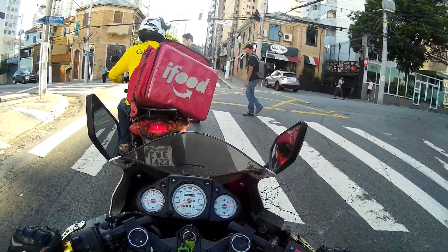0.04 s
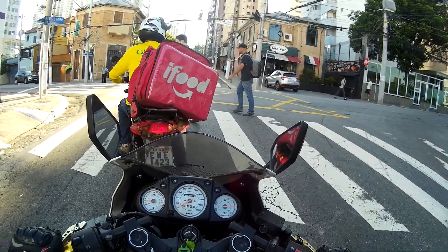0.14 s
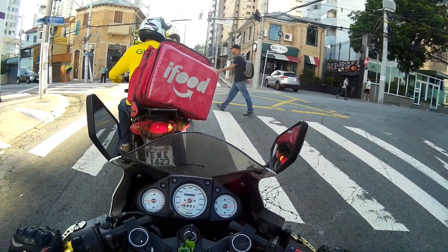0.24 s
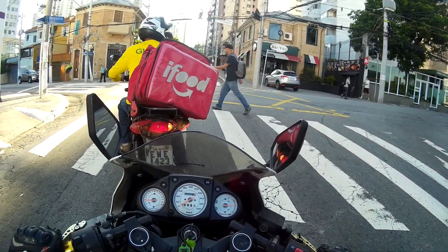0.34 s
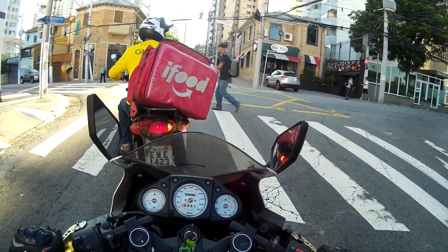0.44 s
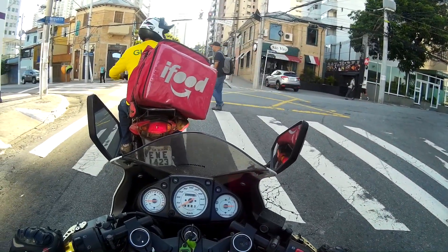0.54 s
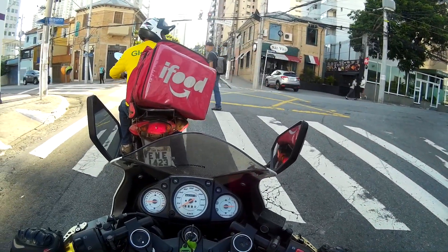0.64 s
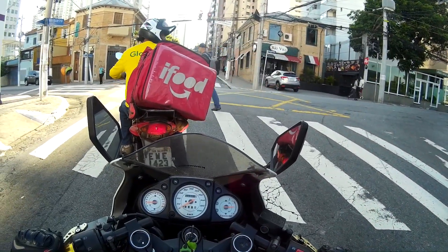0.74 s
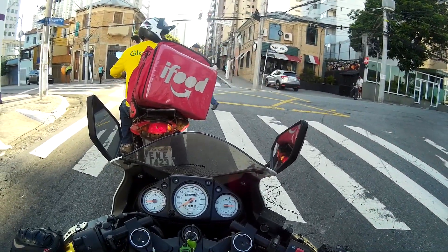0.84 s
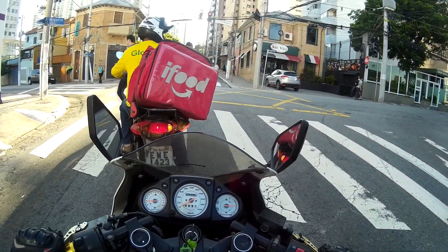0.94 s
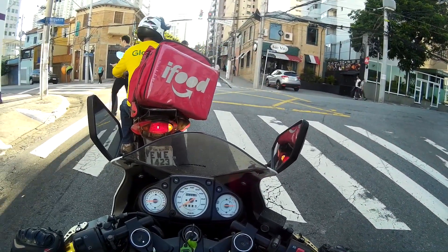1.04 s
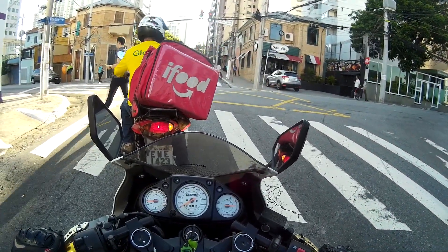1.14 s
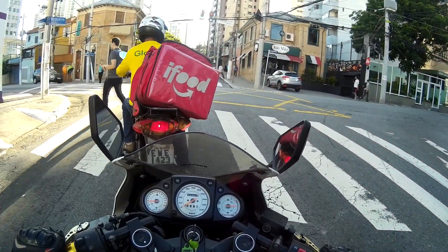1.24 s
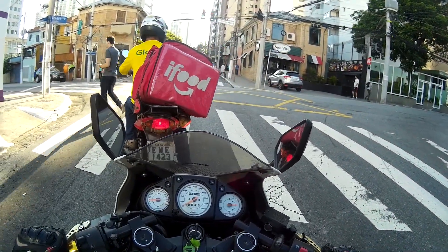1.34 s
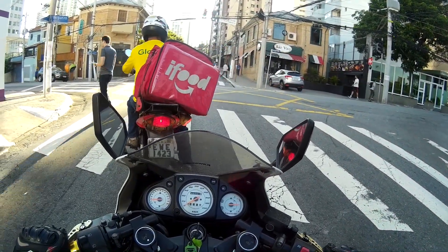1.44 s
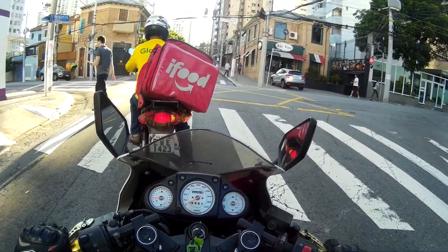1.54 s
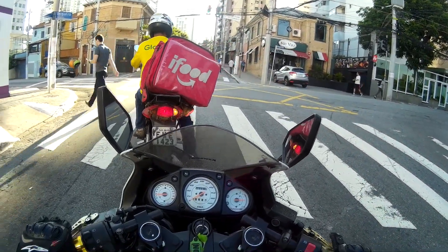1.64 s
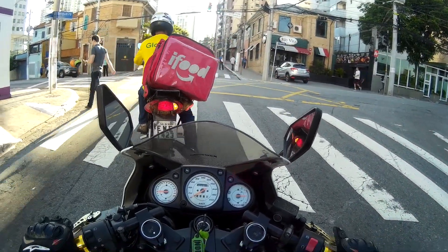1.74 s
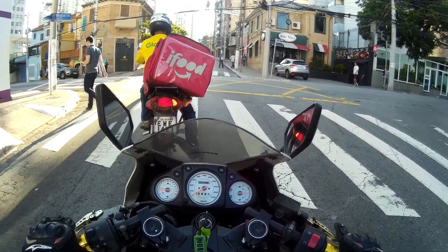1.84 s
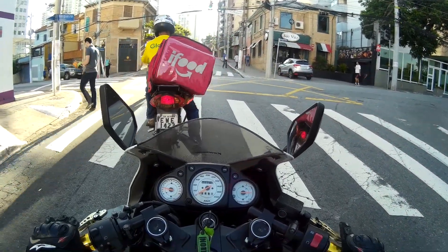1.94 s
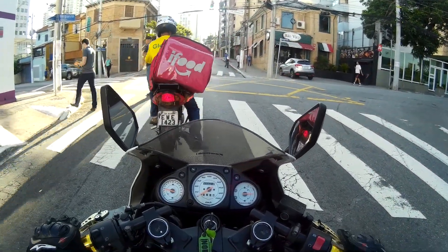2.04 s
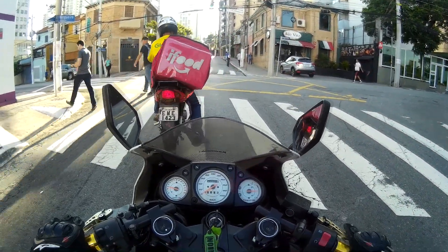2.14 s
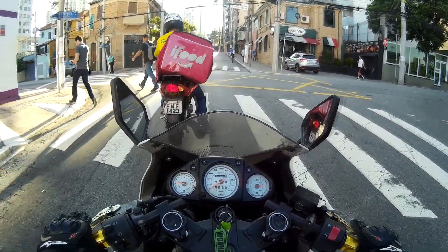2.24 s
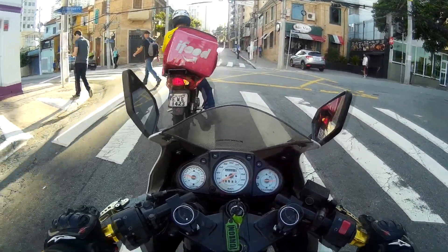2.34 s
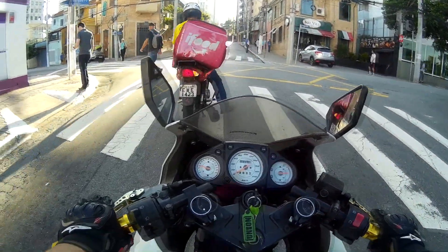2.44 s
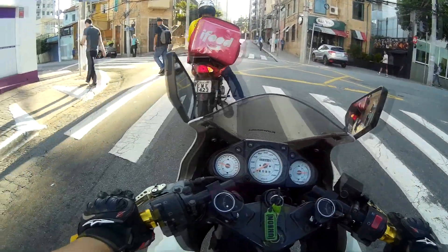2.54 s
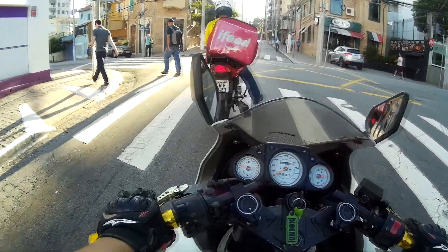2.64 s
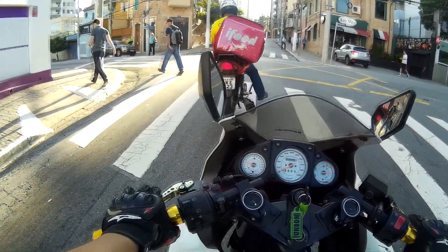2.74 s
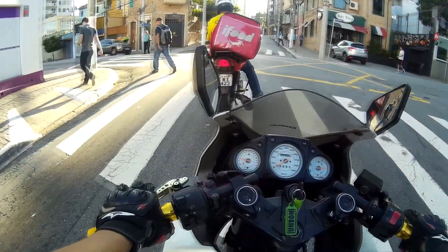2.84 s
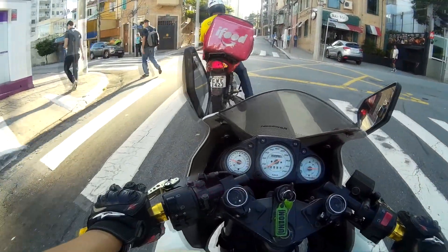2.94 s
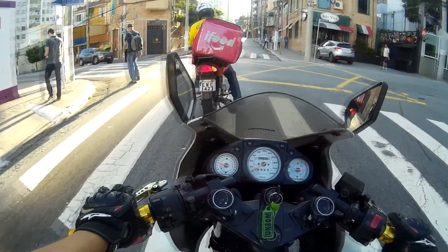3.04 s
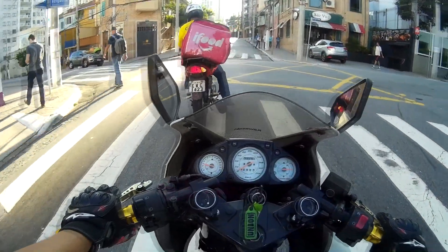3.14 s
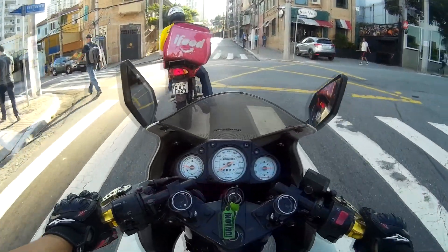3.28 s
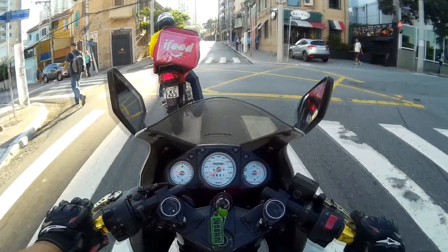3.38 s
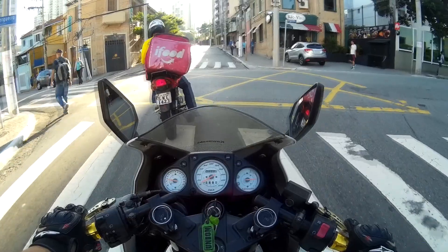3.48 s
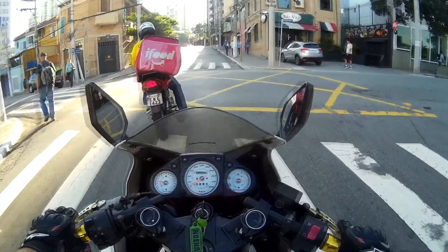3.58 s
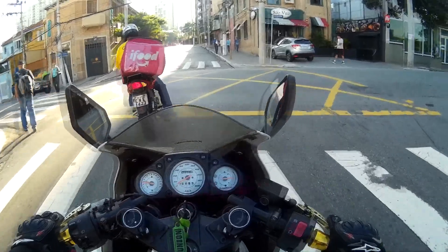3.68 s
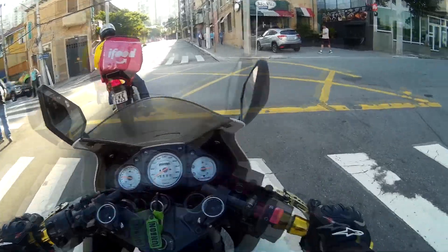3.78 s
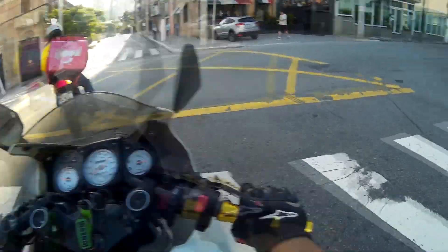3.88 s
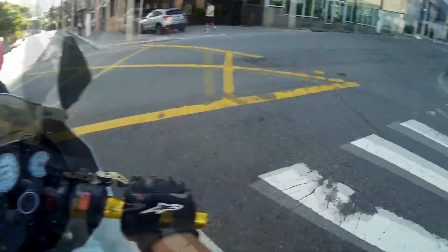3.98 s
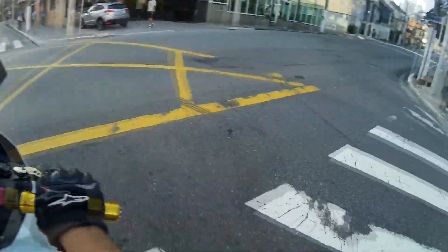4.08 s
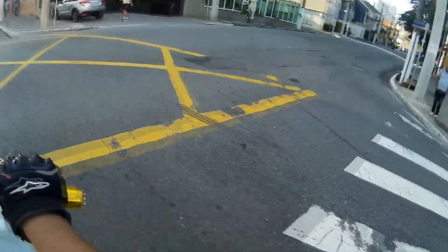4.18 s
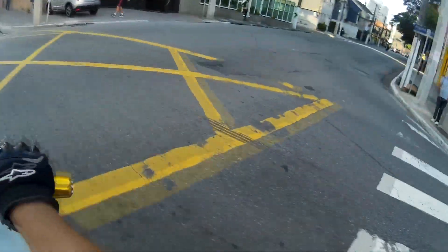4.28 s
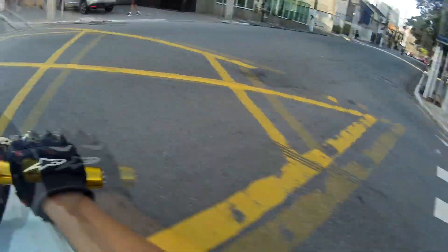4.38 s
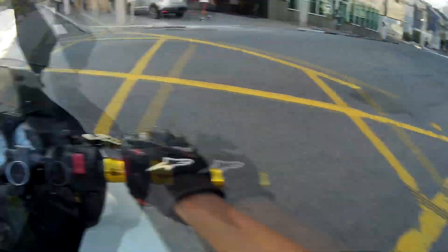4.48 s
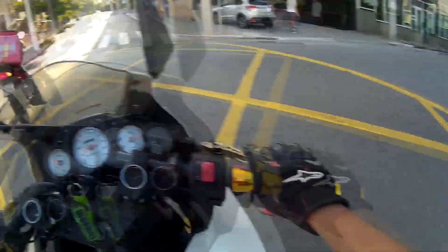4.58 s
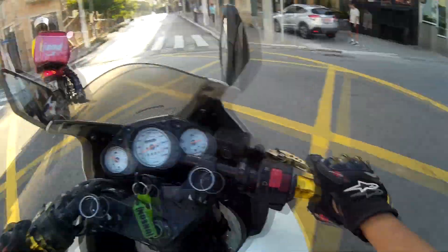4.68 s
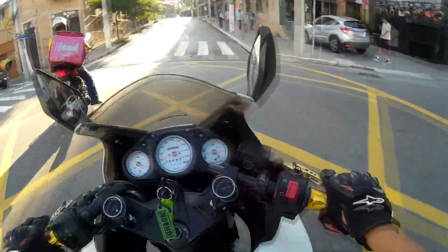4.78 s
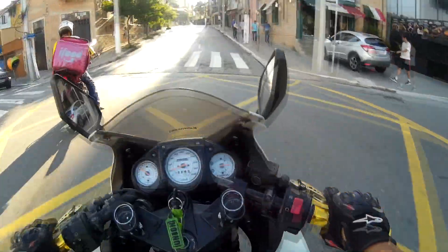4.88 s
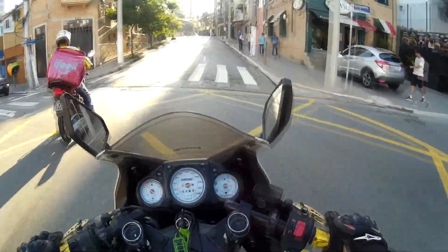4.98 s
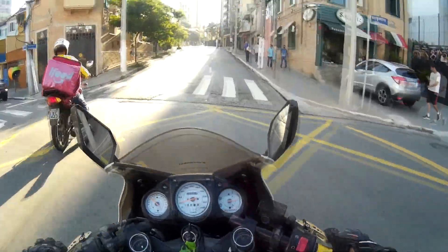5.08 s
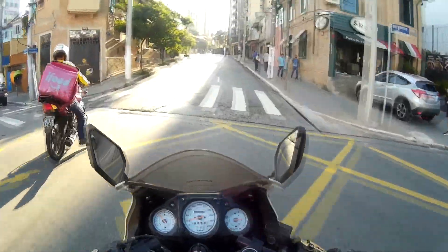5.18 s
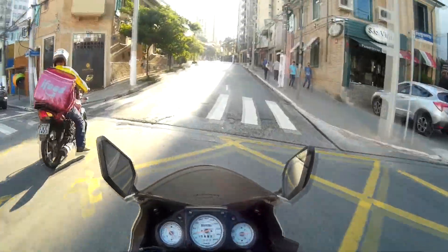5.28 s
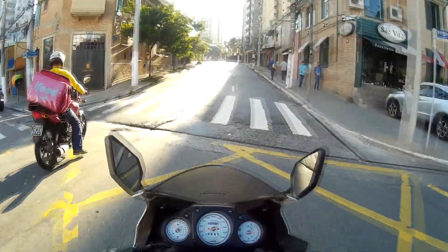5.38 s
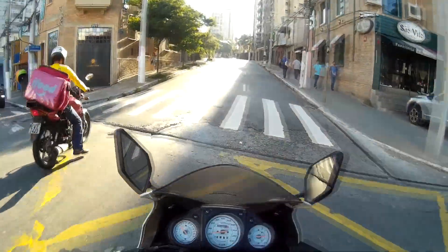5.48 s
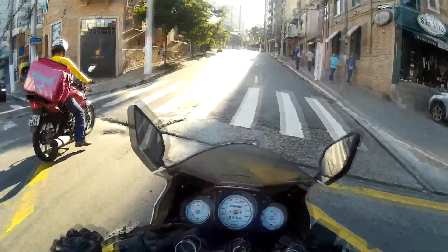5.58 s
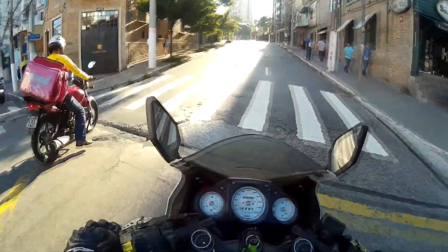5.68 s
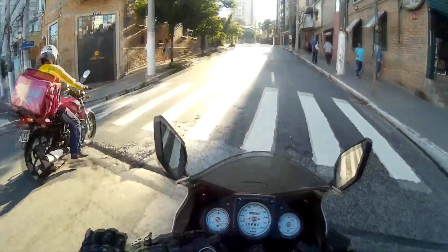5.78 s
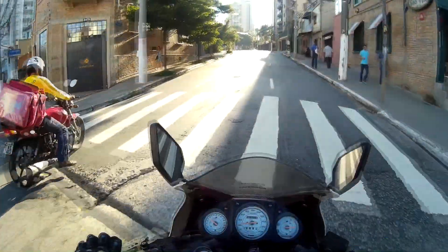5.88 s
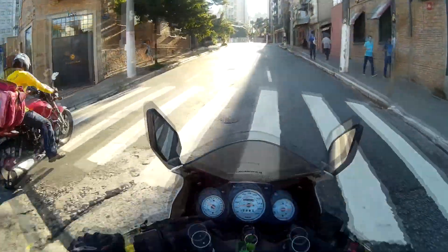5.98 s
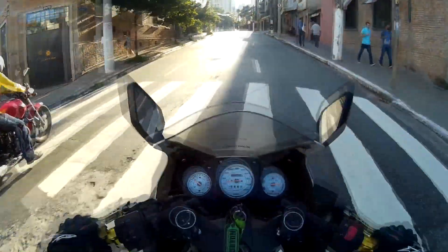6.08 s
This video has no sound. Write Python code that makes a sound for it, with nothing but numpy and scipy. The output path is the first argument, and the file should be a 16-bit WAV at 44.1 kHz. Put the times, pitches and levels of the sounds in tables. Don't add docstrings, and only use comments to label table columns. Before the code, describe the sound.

A twin-cylinder motorcycle idles quietly at a city crossing, blips and pulls away, climbs to a loud raspy roar, then dips for a gear change.

```python
import sys
import numpy as np
from scipy import signal
from scipy.fft import rfft, irfft
from scipy.io import wavfile

SR = 44100
rng = np.random.default_rng(int(sys.argv[2]) if len(sys.argv) > 2 else 0)


def master_out(mix):
    frames = np.transpose(np.atleast_2d(mix))
    ceiling = np.clip(frames, -1, 1)
    pcm = np.round(ceiling * 32767).astype(np.int16)
    wavfile.write(sys.argv[1], SR, pcm)


def linear_from_db(decibels):
    return 10 ** (np.asarray(decibels, float) / 20)


N = 269892

# time_s, speed_cycles_per_s
CRANK_SPEED = [(0.0, 13.64), (0.45, 13.14), (1.42, 13.75), (1.61, 13.22), (1.76, 21.48), (1.96, 25.51),
               (2.1, 24.26), (2.22, 24.25), (2.78, 20.52), (3.37, 20.9), (3.9, 27.27), (5.04, 42.62),
               (5.09, 40.3), (5.2, 39.84), (5.31, 37.15), (5.54, 36.41), (5.66, 30.81), (6.12, 35.22)]
CYCLES_AT_START = -.858
MID_SPEED = 27
# time_s, combustion_effort_db, gas_heat_0_to_1
THROTTLE = [(0, -45.5, 0.57), (1.56, -49, 0.26), (1.66, -37, 0.9), (1.78, -27.5, 0.02), (2.0, -23, 0.39),
            (2.4, -27.5, .23), (2.9, -33, 0.42), (3.55, -26.5, 0.49), (3.9, -21, 0.66), (4.25, -18, 0.84),
            (4.55, -16.5, 0.89), (5.07, -19.5, 0.83), (5.15, -34.5, 0.7), (5.35, -44, 0.2),
            (5.44, -29.5, 0.9), (5.62, -23.5, 0.82), (5.95, -23, 0.97), (6.12, -21, 0.9)]
MID_EFFORT_DB = -30
# centre_s, width_s, change_db
UNEVEN_COMBUSTION = [(1.794, 0.0097, -11), (1.88, .02, 3), (1.92, .02, 3), (1.967, 0.035, -8.5),
                     (2.123, 0.025, -11), (4.334, 0.013, 0.5), (5.119, 0.014, -4.5), (5.144, 0.012, 9),
                     (5.242, 0.039, 9.5), (5.38, 0.0087, -22), (5.628, 0.022, -1.5)]
# level_at_mid_effort_db, effort_slope_db_per_db,
# gain_facing_pipe_db, speed_slope_db_per_cycle_per_s
VOICE_PARTS = dict(blast=(-49, 1.2, 11.5, -0.184), thump=(-27.5, .05, 0.1, 0.06),
               snap=(-43.5, 1.5777, 2.5, 0.23), edge=(-52.5, 0.9, 9.5, 0.886),
               rasp=(-62, 0.6465, -6.5, -0.21), whine=(-60.5, 0.37, -7.5, 0.79))

DEEP_MODES = [(108, 0, .057, -1)]
CHAMBER_MODES = [(153, 0, 0.041, -1)]
THUMP_MODES = [(234, 0, .035, 1)]
RING_MODES = [(493, 0, .052, 1)]
SNAP_MODES = [(616, 0, .024, 1), (809, -4, .032, -1)]
EDGE_MODES = [(993, -3, 0.019, 1), (1116, 1.5, 0.0091, -1), (1960, -18.5, 0.0014, 1)]
# pitch_hz, level_db, t60_s, sign
BLAST_MODES = [(646, 0, 0.01, 1)]
LEADS_S = dict(deep=.0003, thump=.0024, bark=.0011)
SOFT_HZ = dict(low=480, bark=2230)
COOL, HOT = .94, 1.035

IDLE_BELOW_DB, IDLE_THUMP_LOSS = -38, 1.04
DEEP_FADES_AT, DEEP_LOSS_DB = 0.54, 78
CHAMBER_DB, CHAMBER_FROM, CHAMBER_RISE_DB, CHAMBER_TOP_DB = -10.5, 23.7, 9.4, -7.5
OVERRUN_LOSS, OVERRUN_BOOM, CHAMBER_BOOM = .9, .25, 0.42
SECOND_DB, SECOND_FACING_DB = 0.16, 2.5
TURN_S, TURN_WIDTH_S = 4.175, 0.19
RING_FACING_DB, RING_DB_PER_SPEED = -3.5, 0.188

# frequency_hz, density_db_per_hz
JET_SPECTRUM = [(700, -21), (1100, -3), (1500, 1.5), (1900, 1), (2400, -7.5), (2900, -9.5), (3500, -14),
                (4050, -23), (4700, -15.5), (5700, -31.5), (7000, -24.5), (10000, -44.5), (16000, -40.5)]

GEAR_ORDER = 46
CASE_HZ, CASE_WIDTH_HZ, CASE_DB = 1804, 51, 8.5
CLUTCH_OUT_S, CLUTCH_IN_S = 5.06, 5.44
COAST_LOSS, UNLOADED_DB = 9, -5

# start_s, peak_db, pitch_hz, t60_s
METAL_TICKS = [
    (1.791, -53, 7360, 0.02),
    (1.83, -56, 7400, 0.027),
    (1.857, -53, 7300, 0.024),
    (1.92, -44.5, 7300, 0.016),
    (5.556, -54.5, 3460, 0.14),
    (5.58, -49, 3900, 0.065),
]

# time_s, level_db
NEIGHBOUR_LEVEL = [(0, -70), (1.3, -72), (1.42, -87), (1.66, -74), (1.85, -65), (2.5, -68), (3.0, -73.5),
                   (4.5, -77), (5.25, -67.5), (5.36, -85), (6.12, -69)]
RATTLES_PER_S, RATTLE_CYCLES, NEIGHBOUR_HISS_DB = 120, 45.0, 6

# frequency_hz, density_db_per_hz
TRAFFIC_SPECTRUM = [(30, -16), (100, -3), (220, 2), (350, -4.5), (490, -6.5), (900, -12.5), (1200, -22),
                    (1700, -20), (2900, -38.5), (3700, -36.5), (5600, -45.5), (10000, -44), (15500, -52.5),
                    (20000, -73)]
STREET_DB, STREET_RISE_DB_PER_S = -44, 1
PASSING_DB, PASSING_S, PASSING_WIDTH_S = 1.5, 0.08, 0.3
WIND_DB, GUST_DB, GUST_S, GUST_WIDTH_S = -51, 9, 4.6, 0.45
IMAGE_HZ = 16000


def unit(x):
    return x / np.sqrt(np.mean(x ** 2) + 1e-20)


def in_time(rows):
    s, *columns = np.transpose(rows)
    return [np.interp(np.arange(N) / SR, s, c) for c in columns]


def bump(s, width_s):
    return np.exp(-((np.arange(N) / SR - s) / width_s) ** 2)


def drift(rate):
    knots = rng.standard_normal(int(N / SR * 40) + 2)
    return np.interp(np.arange(N) / SR * np.clip(rate, .1, 39), np.arange(len(knots)), knots)


def ring(x, hz, t60):
    r, w = linear_from_db(-60 / (t60 * SR)), 2 * np.pi * hz / SR
    return signal.lfilter([0, np.sin(w)], [1, -2 * r * np.cos(w), r * r], x + 1e-18)


def soften(x, hz):
    r = np.exp(-2 * np.pi * hz / SR)
    return signal.lfilter([1 - r], [1, -r], x + 1e-18)


def coloured(spectrum):
    hz, level_db = np.transpose(spectrum)
    log_hz = np.log(np.arange(N // 2 + 1) * SR / N + 1)
    gain = linear_from_db(np.interp(log_hz, np.log(hz), level_db))
    return unit(irfft(rfft(rng.standard_normal(N)) * gain, N))


def engine():
    speed, = in_time(CRANK_SPEED)
    effort_db, _ = in_time(THROTTLE)
    facing = bump(TURN_S, TURN_WIDTH_S)
    at, puff_db = firings(speed, SECOND_DB + SECOND_FACING_DB * facing)
    puff_db = puff_db - 10 * np.log10(speed[at])
    puff_db = puff_db + 0.52 * rng.standard_normal(len(at))
    burnt_db = puff_db + sum(db * np.exp(-((at / SR - s) / width) ** 2) for s, width, db in UNEVEN_COMBUSTION)
    ring_db = effort_db + RING_FACING_DB * facing + RING_DB_PER_SPEED * (speed - MID_SPEED)

    lead_s, soft_hz = LEADS_S["bark"], SOFT_HZ["bark"]
    ringing = pipe(at, burnt_db + ring_db[at], RING_MODES, lead_s, soft_hz, spread_db=0.9)
    snap = pipe(at, burnt_db + part_db("snap")[at], SNAP_MODES, lead_s, soft_hz, spread_db=0.8)
    edge_db = burnt_db + part_db("edge")[at] + 0.5
    edge = pipe(at, edge_db, EDGE_MODES, lead_s=.0008, soft_hz=2330, spread_db=2.0)
    blast_db = burnt_db + part_db("blast")[at]
    blast = pipe(at, blast_db, BLAST_MODES, lead_s=.0012, soft_hz=2500, spread_db=3.55)

    body = thump(at, puff_db, burnt_db, speed) + ringing + snap + shaken_pipe(at, puff_db + ring_db[at])
    body = side_branch(body, hz=368, width_hz=85, share=0.44)
    return body + blast + edge + rasp(at, burnt_db) + gear_whine(speed)


def firings(speed, second_db):
    turned = CYCLES_AT_START + np.cumsum(speed) / SR
    first = np.arange(-1, int(turned[-1]) + 1)
    marks = np.sort(np.concatenate([first, first + .24]))
    marks = marks[(marks > turned[0]) & (marks < turned[-1])]
    at = np.searchsorted(turned, marks)
    is_second = marks % 1 > .1
    return at, np.where(is_second, second_db[at], 0)


def part_db(name):
    level_db, follows, facing_db, speed_db = VOICE_PARTS[name]
    effort_db = follows * (in_time(THROTTLE)[0] - MID_EFFORT_DB)
    head_db = facing_db * bump(TURN_S, TURN_WIDTH_S)
    return level_db + effort_db + head_db + speed_db * (in_time(CRANK_SPEED)[0] - MID_SPEED)


def puffs(at, level_db, lead_s, jitter_s=0.):
    train = np.zeros(N)
    shift = (lead_s + jitter_s * rng.standard_normal(len(at))) * SR
    np.add.at(train, np.clip(at - shift.astype(int), 0, N - 1), linear_from_db(level_db))
    return train


def pipe(at, level_db, modes, lead_s, soft_hz, spread_db):
    heat = np.clip(in_time(THROTTLE)[1], 0, 1)
    step = 4 * heat
    out, power = 0, 0
    for hz, mode_db, t60, sign in modes:
        own_db = level_db + mode_db + spread_db * rng.standard_normal(len(at))
        train = np.sign(sign) * puffs(at, own_db, lead_s, jitter_s=.00004)
        for k, factor in enumerate(np.linspace(COOL, HOT, 5)):
            share = np.clip(1 - abs(step - k), 0, 1)
            out = out + ring(train * share, factor * hz, t60)
        power += linear_from_db(mode_db) ** 2 * t60 / np.log(1000) / 2
    return soften(soften(out, soft_hz), soft_hz) / np.sqrt(power)


def thump(at, puff_db, burnt_db, speed):
    effort_db, heat = in_time(THROTTLE)
    idling = np.clip(IDLE_BELOW_DB - effort_db, 0, None) * (speed < CHAMBER_FROM)
    overrun = np.clip(MID_EFFORT_DB + 3.5 - effort_db, 0, None) * (speed > MID_SPEED)
    deep_db = OVERRUN_BOOM * overrun - DEEP_LOSS_DB * np.clip(heat - DEEP_FADES_AT, 0, 1)
    woken_db = CHAMBER_DB + CHAMBER_RISE_DB * np.clip(speed - CHAMBER_FROM, 0, None)
    chamber_db = CHAMBER_BOOM * overrun + np.minimum(woken_db, CHAMBER_TOP_DB)
    thump_db = part_db("thump") - IDLE_THUMP_LOSS * idling
    low_db = 1.028 * puff_db + 0.46 * burnt_db + thump_db[at]

    soft_hz = SOFT_HZ["low"]
    deep = pipe(at, low_db + deep_db[at], DEEP_MODES, LEADS_S["deep"], soft_hz, spread_db=1.1)
    chamber = pipe(at, low_db + chamber_db[at], CHAMBER_MODES, 0.0008, soft_hz, spread_db=2.5)
    main_db = low_db - OVERRUN_LOSS * overrun[at]
    return deep + chamber + pipe(at, main_db, THUMP_MODES, LEADS_S["thump"], soft_hz, spread_db=1.1)


def shaken_pipe(at, level_db):
    gas = soften(puffs(at, level_db, lead_s=0.), 3.4) * rng.standard_normal(N)
    return linear_from_db(34.5) * sum(linear_from_db(db) * ring(gas, hz, t60) for hz, db, t60, sign in RING_MODES + SNAP_MODES)


def side_branch(x, hz, width_hz, share):
    band = signal.butter(1, [hz - width_hz / 2, hz + width_hz / 2], "band", fs=SR, output="sos")
    return x - np.clip(share, 0, 1) * signal.sosfilt(band, x)


def rasp(at, burnt_db):
    jet_db = burnt_db + part_db("rasp")[at] + 1.9 * rng.standard_normal(len(at))
    jet = puffs(at, jet_db, lead_s=0.0011)
    burst = soften(soften(jet, 30), 200)
    tail = linear_from_db(1.5) * soften(jet, 8)
    return linear_from_db(74.5) * (burst + tail) * coloured(JET_SPECTRUM)


def gear_whine(speed):
    t = np.arange(N) / SR
    mesh = 1 + 8.9 * soften(rng.standard_normal(N), 60)
    coasting = np.maximum.accumulate(speed + COAST_LOSS * t) - COAST_LOSS * t
    freed = (t > CLUTCH_OUT_S) & (t < CLUTCH_IN_S)
    gear = np.where(freed, coasting, speed)
    case_db = CASE_DB * np.exp(-((GEAR_ORDER * gear - CASE_HZ) / CASE_WIDTH_HZ) ** 2)
    level_db = part_db("whine") + UNLOADED_DB * freed + case_db + 3.2 * drift(25)
    return linear_from_db(level_db) * mesh * np.sin(2 * np.pi * GEAR_ORDER * np.cumsum(gear) / SR)


def ticks():
    out, t = np.zeros(N), np.arange(N) / SR
    for s, db, hz, t60 in METAL_TICKS:
        burst = rng.standard_normal(N) * (t > s) * linear_from_db(-60 * np.clip(t - s, 0, 1) / t60)
        out += linear_from_db(db - 12.5) * ring(burst, hz, 0.0091)
    return out


def kerb_echoes(x):
    out = np.zeros(N)
    for lag_s, db in [(.009, -17), (.023, -20.5), (.041, -33), (.067, -24)]:
        lag = int(lag_s * SR)
        out[lag:] += linear_from_db(db) * x[:-lag]
    return soften(out, 2800)


def neighbour():
    struck = rng.random(N) < RATTLES_PER_S / SR
    sizes = linear_from_db(9.1 * np.minimum(rng.exponential(1, N), 2)) * struck
    dealt = rng.integers(0, 10, N)
    rattle = np.zeros(N)
    for k, hz in enumerate(np.geomspace(3100, 5400, 10)):
        rattle += ring(sizes * (dealt == k), hz, RATTLE_CYCLES / hz)
    hiss = coloured([(1200, -29), (2400, -1), (4800, -7.5), (9000, -16), (16000, -41)])
    return linear_from_db(in_time(NEIGHBOUR_LEVEL)[0]) * (unit(rattle) + linear_from_db(NEIGHBOUR_HISS_DB) * hiss)


def street():
    traffic_db = STREET_DB + PASSING_DB * bump(PASSING_S, PASSING_WIDTH_S)
    traffic_db = traffic_db + STREET_RISE_DB_PER_S * np.arange(N) / SR + .8 * drift(14)
    traffic = linear_from_db(traffic_db) * coloured(TRAFFIC_SPECTRUM)
    low_band = signal.butter(2, [20, 60], "band", fs=SR, output="sos")
    lows = signal.sosfilt(low_band, rng.standard_normal(N))
    wind_db = WIND_DB + GUST_DB * bump(GUST_S, GUST_WIDTH_S) + 1.9 * drift(7)
    return traffic + linear_from_db(wind_db) * unit(lows)


def scene():
    bike = engine()
    return (bike + kerb_echoes(bike) + ticks() + neighbour() + street())[None]


def top_cut(x):
    return signal.sosfilt(signal.butter(12, 15750, fs=SR, output="sos"), x)


def record(dry):
    thin = signal.sosfilt(signal.butter(2, 60, "high", fs=SR, output="sos"), dry)
    mirror = linear_from_db(-62.5) * thin * np.cos(2 * np.pi * IMAGE_HZ * np.arange(N) / SR)
    return top_cut(thin + mirror)


dry = scene()
out = record(dry)
master_out(out)
```